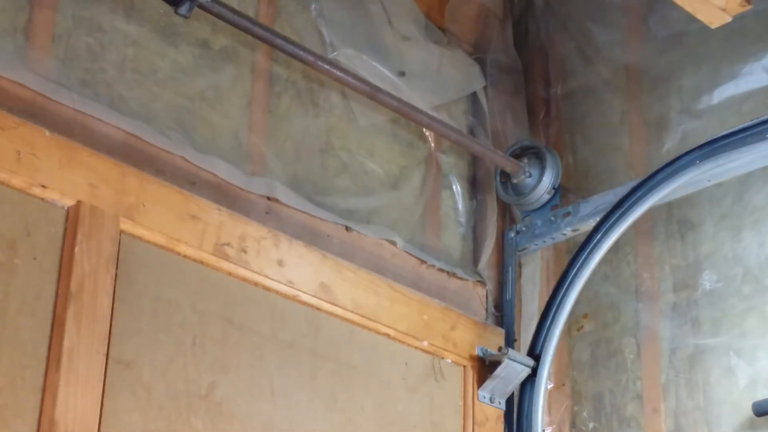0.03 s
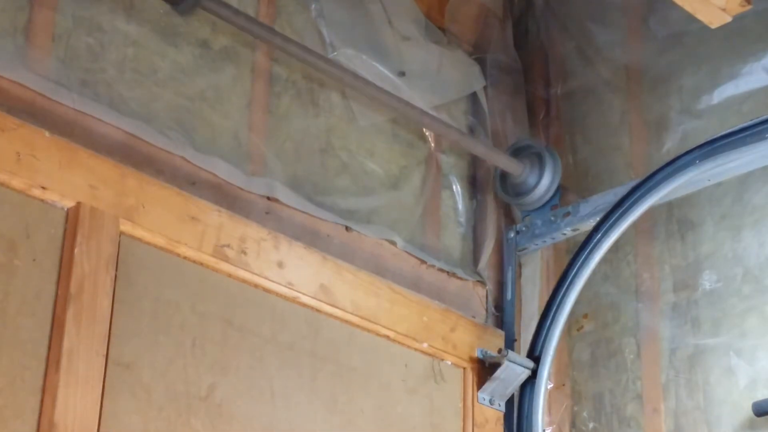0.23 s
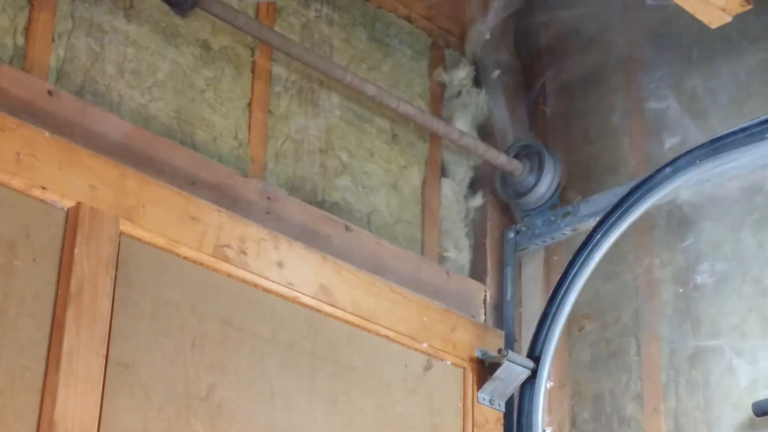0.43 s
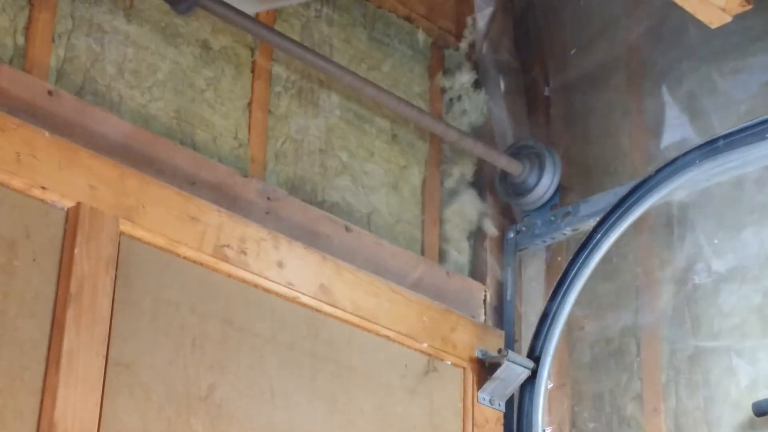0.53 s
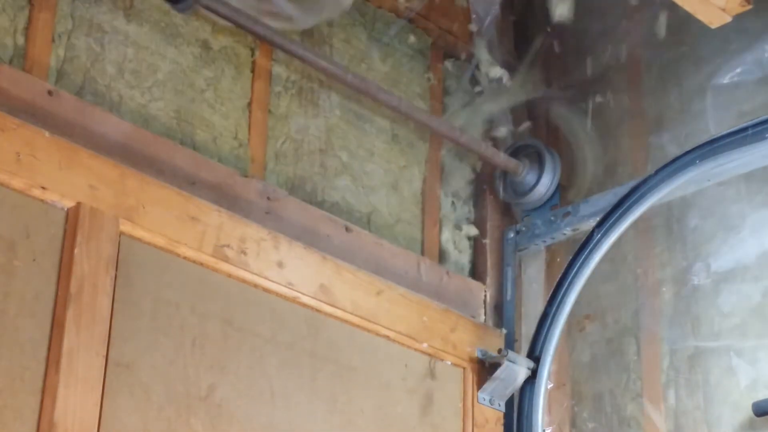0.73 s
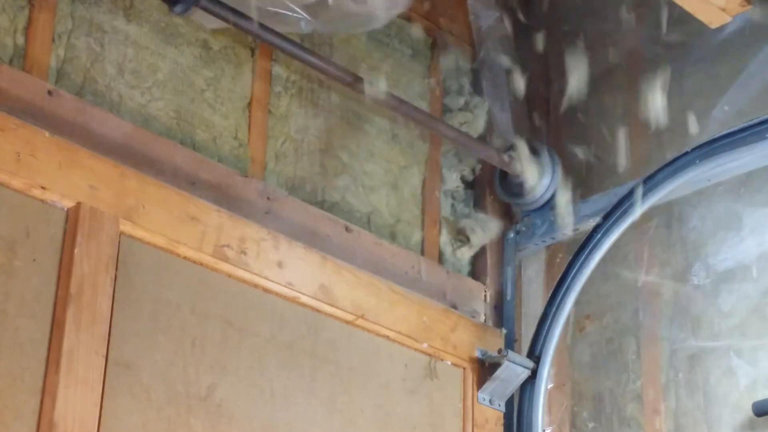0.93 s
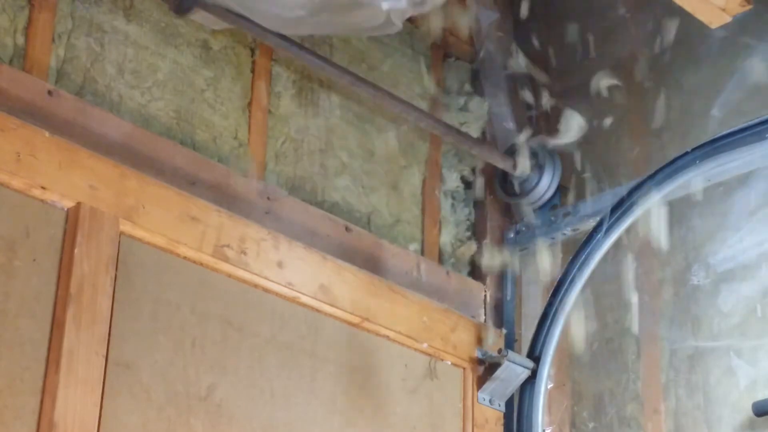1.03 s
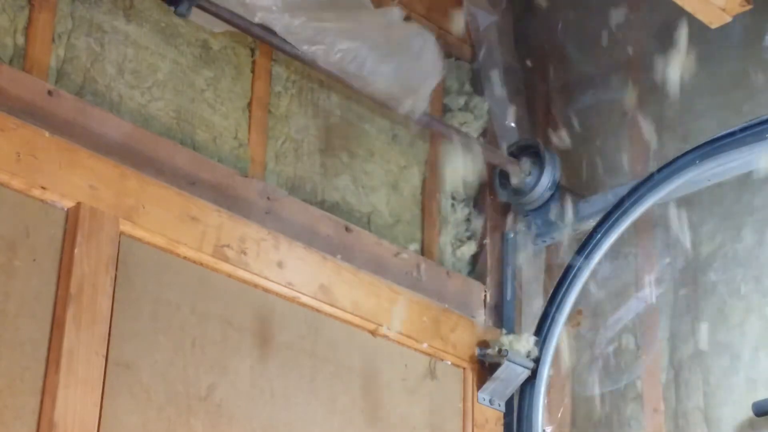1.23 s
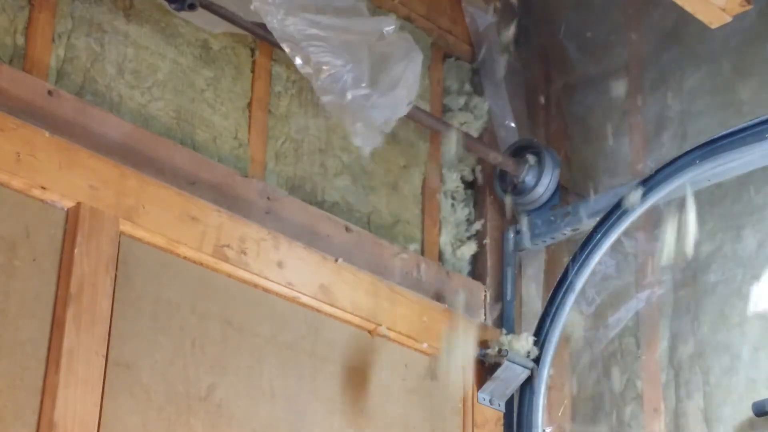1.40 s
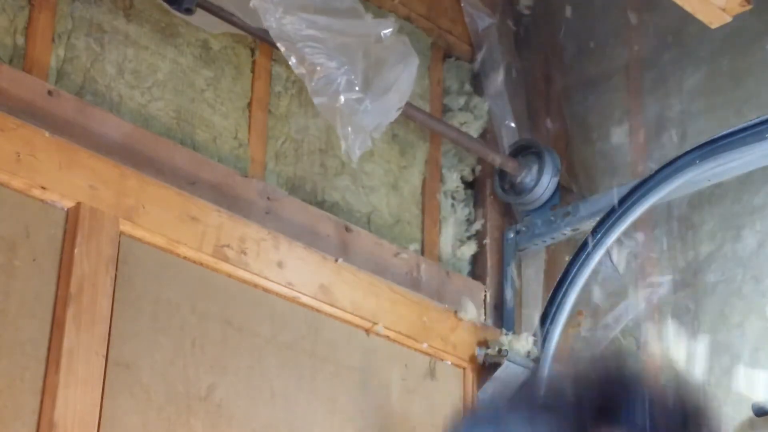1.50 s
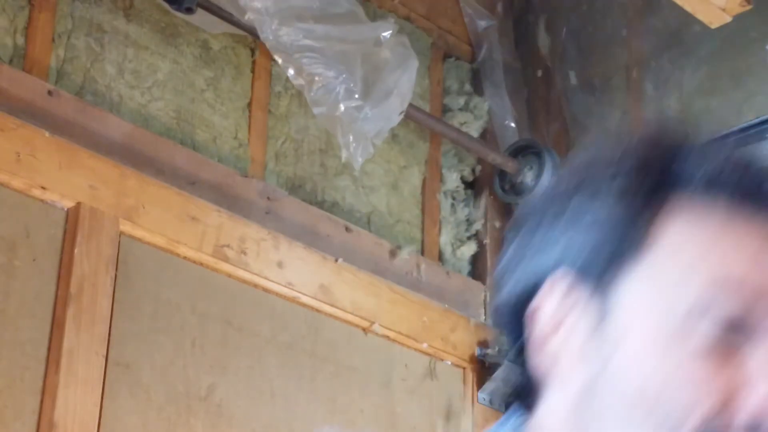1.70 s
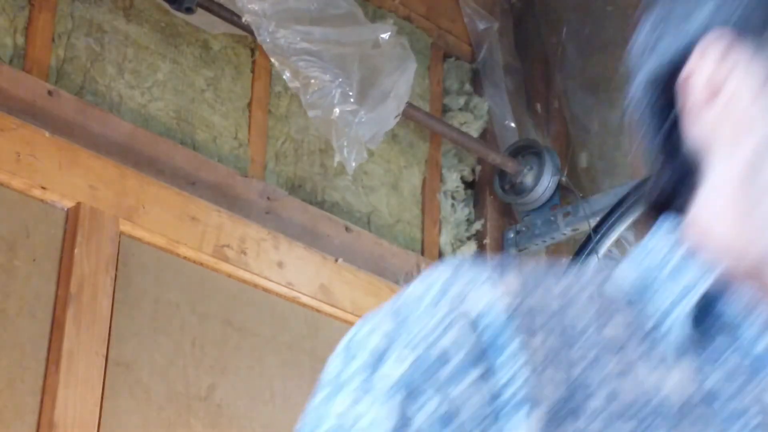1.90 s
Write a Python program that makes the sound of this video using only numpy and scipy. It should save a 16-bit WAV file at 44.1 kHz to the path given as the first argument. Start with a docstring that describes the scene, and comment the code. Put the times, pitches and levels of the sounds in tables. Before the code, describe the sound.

A loud crash as a taut steel cable breaks, followed by ringing metal and pattering debris.

```python
"""A tight garage door cable is cut: two strands tick, then the rest snaps.
The freed spring spins the drum, whipping the loose cable against wall and track. The steel shaft
and track ring, the wooden wall rumbles, and the bare garage echoes.
Then the cable scrapes and slaps ever more weakly while debris patters down.
Near the end a plastic sheet rustles as it drops."""
import sys
import numpy as np
from scipy import signal
from scipy.fft import rfft, irfft, next_fast_len
from scipy.io import wavfile
from scipy.ndimage import map_coordinates

SR = 44100
rng = np.random.default_rng(int(sys.argv[2]) if len(sys.argv) > 2 else 0)


def dump(signal):
    """Clip the signal to [-1, 1] and save it as 16-bit WAV at the path in sys.argv[1]."""
    limited = np.clip(np.atleast_2d(signal).T, -1, 1)
    pcm = np.round(limited * 32767).astype(np.int16)
    wavfile.write(sys.argv[1], SR, pcm)


N = 85995
T = np.arange(N) / SR
THRASH_START_S, FULL_FORCE_S, THRASH_FADE_S = 0.24, 0.26, 0.36
# Direct sound compared with its echo; the broad wall is heard mostly through the room.
DIRECT_DB, WALL_DIRECT_DB = -7, -18


def cable_cut():
    """Single strands give way with a tick, then the whole cable parts, wire after wire."""
    # strands breaking: t/s, level/dB
    strands = [(0.134, -57), (0.147, -41.5)]
    # tone of the ticks and of the snap: f/Hz, level/dB
    tick_colour = [(50, -16), (170, -5), (500, -8), (1400, -5), (2600, -6.5), (3800, 2), (5200, -8),
                   (6700, -2.5), (9300, -19.5), (15000, -9)]
    snap_colour = [(60, -16), (130, -19), (210, 1.5), (600, 1.5), (1000, 0.5), (1900, 3.5), (2800, 0.5),
                   (4500, 2), (7000, -3), (10000, -4.5), (15000, -6)]
    ticks = sum(garage(hit(s, db, length_s=0.0056)) for s, db in strands)
    snap = garage(hit(0.2205, db=-18.5, length_s=0.0043, rise_s=0.0034))
    return coloured(ticks, tick_colour) + coloured(snap, snap_colour)


def cable_thrash():
    """The drum whips the cable round at full force, with a few heavy blows on the wall."""
    # blows on the wall: t/s, level/dB
    wall_blows = [(0.263, -24.5), (.283, -17), (.304, -18.5), (.335, -19), (.361, -19.5), (0.384, -25.5)]
    # tone of the lashing and of the blows: f/Hz, level/dB
    lash_colour = [(25, -37), (42, -26), (70, -5.5), (160, -0.5), (380, -5.5), (800, -1), (2000, -1),
                   (3200, -0.5), (6000, 3), (10000, 0), (15000, 1.5)]
    blow_colour = [(30, -20), (45, -3), (80, 5), (170, 4), (300, 7.5), (420, 7), (700, 2.5), (2000, 3),
                   (6000, -3.5), (15000, -8)]
    rise_db_per_s, fall_db_per_s = 210, 190
    force_db = -8.5 - rise_db_per_s * np.maximum(FULL_FORCE_S - T, 0)
    force_db -= fall_db_per_s * np.maximum(T - THRASH_FADE_S, 0)
    force_db = np.where(T > THRASH_START_S, force_db, -120)
    lashing = clatter(force_db, lash_colour, per_s=2500, scatter_db=5.5)
    blows = sum(garage(hit(s, db, length_s=0.0044), WALL_DIRECT_DB) for s, db in wall_blows)
    return lashing + coloured(blows, blow_colour)


def loose_cable():
    """The cable's end slaps the track, then from about 1.58 s bounces duller on the floor, while the rest
    scrapes round the slowing drum."""
    # slaps on the track, from 1.58 s on bounces on the floor: t/s, level/dB, contact length/s, brightness/(dB
    # per octave)
    slap_hits = [(0.535, -27.5, 0.01, -3), (.55, -30.5, 0.027, -2.5), (0.6164, -29.5, 0.009, -3),
                 (0.7806, -23.5, 0.0047, -0.5), (0.811, -27.5, 0.016, -2), (0.918, -28, 0.011, 0),
                 (0.954, -31, 0.009, 2.5), (1.1123, -34.5, 0.0037, 1), (1.1932, -25.5, 0.0074, 3),
                 (1.262, -35.5, 0.016, 0.5), (1.336, -32, 0.013, 1), (1.364, -36.5, 0.0098, -3.5),
                 (1.4008, -27.5, 0.0045, 0), (1.5834, -38.5, 0.0066, 0), (1.664, -40, 0.0047, -2.5),
                 (1.70, -45.5, 0.0043, -0.5), (1.761, -48, 0.01, -4), (1.8177, -44.5, 0.0074, -4.5)]
    # loudness of the scraping: t/s, level/dB
    scrape_levels = [(.40, -19), (.47, -19), (.54, -15), (.60, -20.5), (.67, -17), (.74, -27.5), (.85, -24),
                     (.89, -30), (.97, -28), (1.01, -37.5), (1.07, -30.5), (1.17, -36.5), (1.28, -29.5),
                     (1.42, -36.5), (1.52, -40.5), (1.70, -50.5), (1.94, -48.5)]
    # tone of the slaps and of the scraping: f/Hz, level/dB
    slap_colour = [(100, -18.5), (600, -23.5), (2000, -8), (2900, -10), (3600, -2), (5000, -0.5),
                   (6500, 1.5), (8500, -5), (11000, -4.5), (15000, -7.5)]
    scrape_colour = [(200, -33), (900, -13.5), (2400, -6.5), (3500, -9.5), (5500, 0), (7000, -3),
                     (8550, -4.5), (8850, 4.5), (9300, -1), (15000, -4)]
    slaps = np.zeros((2, N))
    for s, db, length_s, brightness in slap_hits:
        tilted = [(hz, tone_db + brightness * np.log2(hz / 5000)) for hz, tone_db in slap_colour]
        slaps += coloured(garage(hit(s, db, length_s), direct_db=-6.5), tilted)
    catch_db = 2.5 * wobble(per_s=45)  # the cable catches and slips unevenly
    scrape = clatter(level_curve(scrape_levels) + catch_db, scrape_colour, per_s=900, scatter_db=3)
    return (slaps + scrape) * amp([[0.25], [-0.25]])  # the loose end hangs a little to the left


def ringing_steel(cable, track_db=-19, coil_db=-18):
    """Shaken by the cable, shaft and track ring with a few strong tones, the spring with many faint."""
    # tones of shaft and track: f/Hz, level/dB, time to fade by 60 dB/s
    track_tones = [(380, 1, 0.13), (444, -3, 0.18), (924, -3.5, 0.44), (1872, 1, 0.29), (2474, 10, 0.93),
                   (2603, 1, 0.32), (2850, -3, 0.42), (3370, 4.5, .5), (4250, 5, .4), (4770, 9, 0.69),
                   (5880, -6, 0.58), (6160, 5, 0.94), (6940, -29, .4), (8880, -0.5, 0.65)]
    t = T[:SR]

    def ring(hz, fade_s):
        """One fading tone, starting at a random point of its wave in each channel."""
        return np.sin(2 * np.pi * (hz * t + rng.random((2, 1)))) * amp(-60 * t / fade_s)

    track = sum(amp(db) * ring(hz, fade_s) for hz, db, fade_s in track_tones)
    coil = sum(ring(hz, fade_s=1) for hz in rng.uniform(700, 8000, 160))
    track *= amp(track_db) / np.linalg.norm(track[0])
    coil *= amp(coil_db) / np.linalg.norm(coil[0])
    return convolved(cable, track + coil)


def cable_end_pings(rise_s=0.002, fade_s=0.1):
    """The metal piece on the cable's end strikes steel with short, bright rings."""
    # pings: t/s, f/Hz, level/dB
    strikes = [(.553, 6713, -22), (.618, 5857, -15), (1.05, 2474, -35), (1.40, 3490, -32)]
    pings = np.zeros(N)
    for s, hz, db in strikes:
        age = np.maximum(T - s, 0)
        loudness = amp(db - 60 * age / fade_s) * (1 - np.exp(-age / rise_s))
        pings += loudness * np.sin(2 * np.pi * hz * age)
    return garage(pings, direct_db=0)


def wall_and_debris():
    """Debris lands on wall and floor while the wooden frame rumbles under the spinning shaft."""
    # dull knocks as the frame shifts and lumps land: t/s, level/dB, f/Hz
    knock_hits = [(0.151, -54.5, 89.5), (.19, -60, 120), (0.659, -41, 91.7), (0.721, -57, 184),
                  (1.039, -43, 222), (1.138, -45, 280), (1.358, -53.5, 540), (1.479, -49, 247),
                  (1.528, -51, 95.5), (1.619, -50, 149), (1.732, -53.5, 149)]
    # loudness of the debris and of the rumble: t/s, level/dB
    debris_levels = [(.40, -58), (.48, -33.5), (.535, -23.5), (.62, -30), (.72, -24), (.82, -35.5),
                     (.88, -28.5), (1.05, -36.5), (1.19, -37.5), (1.25, -40.5), (1.35, -38.5), (1.53, -58),
                     (1.60, -44.5), (1.94, -55)]
    rumble_levels = [(.15, -65), (.225, -53), (.27, -31.5), (.45, -42), (.72, -41.5), (1.12, -45.5),
                     (1.25, -48.5), (1.55, -49), (1.94, -56.5)]
    # tone of the debris and of the rumble: f/Hz, level/dB
    debris_colour = [(60, -25), (200, -1), (400, -2.5), (800, 1), (1500, -2), (2500, -3.5), (4000, -29.5),
                     (12000, -8.5)]
    rumble_colour = [(25, -33), (42, -20), (62, -6), (92, 2.5), (125, -1), (220, 1), (320, -7), (700, -16),
                     (3000, -61)]
    knocks = np.zeros((2, N))
    for s, db, hz in knock_hits:
        dull = [(hz / 4, -27.5), (hz, 0), (hz * 4, -27.5), (SR / 2, -80)]  # one peak at the pitch
        knocks += coloured(garage(hit(s, db, length_s=0.0058), WALL_DIRECT_DB), dull)
    patter = clatter(level_curve(debris_levels), debris_colour, per_s=500, scatter_db=2.5)
    rumble_db = level_curve(rumble_levels)
    rumble = clatter(rumble_db, rumble_colour, per_s=600, scatter_db=2, direct_db=WALL_DIRECT_DB)
    return knocks + patter + rumble


def plastic_sheet(loudest_s=1.47, peak_db=-46, slope_db_per_s=16):
    """A torn sheet creases as it falls; the rustle swells and fades."""
    # tone of the rustle: f/Hz, level/dB
    rustle_colour = [(200, -13), (700, -4), (1800, 2.5), (2700, 0), (4500, -8.5), (8000, -8), (15000, -20)]
    swell_db = peak_db - slope_db_per_s * np.abs(T - loudest_s)
    return clatter(np.where(T > THRASH_FADE_S, swell_db, -120), rustle_colour, per_s=700, scatter_db=6)


def garage(x, direct_db=DIRECT_DB):
    """Sound arrives directly and as a fading echo, different for each place in the room."""
    # length of the echo: f/Hz, time to fade by 60 dB/s
    echo_times = [(80, 0.39), (300, 0.28), (1500, 0.35), (6000, 0.34), (15000, 0.23)]
    right_lag_s = 0.00035  # the direct sound reaches the left side first
    hz, t, noise = signal.stft(rng.standard_normal((2, SR * 2 // 3)), SR, nperseg=256)
    fade = amp(-60 * t / along(echo_times, hz)[:, None])
    echo = signal.istft(noise * fade, SR, nperseg=256)[1]
    echo /= np.linalg.norm(echo[0])
    echo[0, 0] += amp(direct_db)
    echo[1, round(right_lag_s * SR)] += amp(direct_db)
    return convolved(x, echo / np.linalg.norm(echo[0]))


def room_hush():
    """The faint, low, steady noise of the quiet garage."""
    # tone of the hush: f/Hz, level/dB
    hush_colour = [(25, 1), (90, -1), (220, -4.5), (500, -17.5), (2000, -32), (6000, -30), (15000, -48)]
    return amp(-64) * coloured(rng.standard_normal((2, N)), hush_colour)


def contacts(per_s, scatter_db):
    """Tiny impacts at random moments and of random size, scaled to an average power of 1."""
    sizes = amp(scatter_db * np.clip(rng.standard_normal(N), -2, 2)) * rng.choice([-1, 1], N)
    clicks = sizes * (rng.random(N) < per_s / SR)
    return clicks / np.sqrt(np.mean(clicks ** 2) + 1e-20)


def hit(start_s, db, length_s, rise_s=0.0004):
    """A burst of tiny impacts that dies away; db is its level if spread over a tenth of a second."""
    age = np.maximum(T - start_s, 0)
    burst = contacts(per_s=7000, scatter_db=5.5) * (1 - np.exp(-age / rise_s)) * np.exp(-age / length_s)
    return amp(db) * burst * np.sqrt(SR / 10 / (np.sum(burst ** 2) + 1e-20))


def clatter(level_db, colour, per_s, scatter_db, direct_db=DIRECT_DB, places=3):
    """A stream of impacts from several places in the room."""
    streams = (amp(level_db) * contacts(per_s / places, scatter_db) for _ in range(places))
    heard = sum(garage(stream, direct_db) for stream in streams)
    return coloured(heard / np.sqrt(places), colour)


def coloured(x, colour, size=8192):
    """Give x a tone colour, a list of (f/Hz, level/dB) points, with a filter of energy 1."""
    gains = amp(along(colour, np.fft.rfftfreq(size, 1 / SR)))
    cepstrum = irfft(np.log(gains))
    # Folding this onto its first half makes the filter ring only after a hit, never before.
    cepstrum[1:size // 2] *= 2
    cepstrum[size // 2 + 1:] = 0
    response = irfft(np.exp(rfft(cepstrum)))
    return convolved(x, response / np.linalg.norm(response))


def convolved(x, response):
    """Let every sample of x set off a copy of the response."""
    return signal.fftconvolve(np.atleast_2d(x), np.atleast_2d(response), axes=1)[:, :N]


def wobble(per_s):
    """A smooth curve through per_s random values a second."""
    return map_coordinates(rng.standard_normal(400), [T * per_s], mode="wrap")


def level_curve(points):
    """Join (t/s, level/dB) points into a curve, silent before the first."""
    return np.interp(T, *np.transpose(points), left=-120)


def along(points, hz):
    """Read between (f/Hz, value) points, with octaves evenly spaced."""
    pitches, values = np.transpose(points)
    return np.interp(np.log(hz + 1), np.log(pitches + 1), values)


def amp(db):
    """Turn decibels into a volume factor."""
    return 10 ** (np.asarray(db) / 20)


def scene():
    """Cable, ringing steel, wall and plastic sheet over the quiet of the garage."""
    cable = cable_cut() + cable_thrash() + loose_cable()
    hush = room_hush()
    return cable + ringing_steel(cable) + cable_end_pings() + wall_and_debris() + plastic_sheet() + hush


def record(dry, ceiling=0.98, top_hz=15600):
    """The microphone's openings colour the sound; loud peaks are rounded and the top treble is cut."""
    # microphone response: f/Hz, level/dB
    microphone = [(25, -19), (42, -6), (60, -1), (5200, 0), (6000, 0.5), (6700, 3), (7200, -.5), (8200, -3),
                  (8900, 0), (15000, -4.5)]
    size = next_fast_len(N + SR // 2)
    hz = np.fft.rfftfreq(size, 1 / SR)
    heard = irfft(rfft(dry, size) * amp(along(microphone, hz)), size)[:, :N]
    rounded = heard / (1 + np.abs(heard / ceiling) ** 6) ** (1 / 6)
    return irfft(rfft(rounded, size) * (hz < top_hz), size)[:, :N]


dry = scene()
out = record(dry)
dump(out)
```